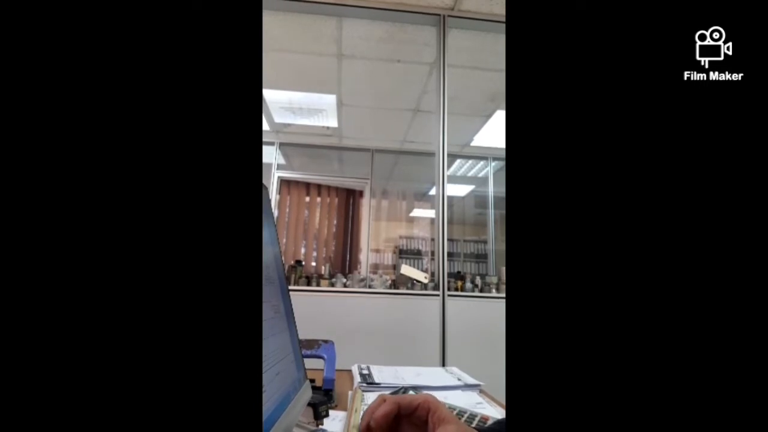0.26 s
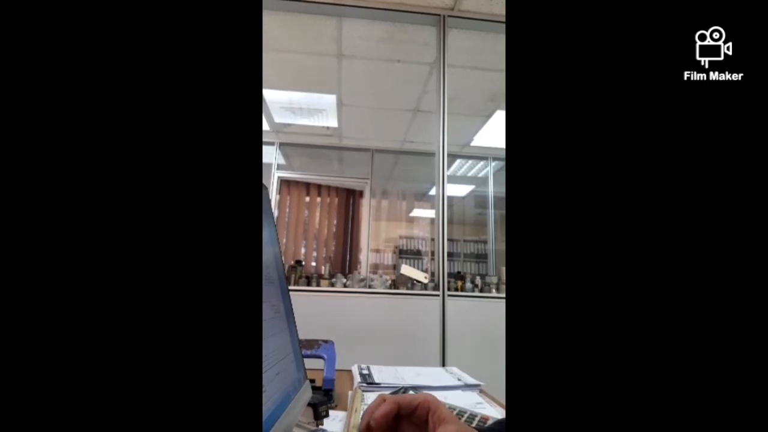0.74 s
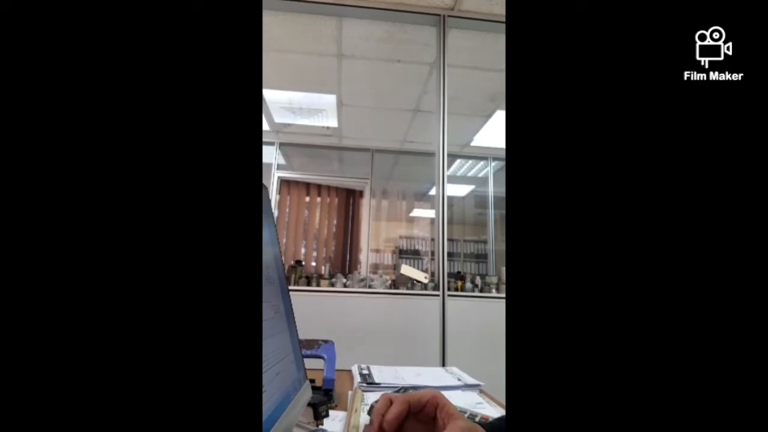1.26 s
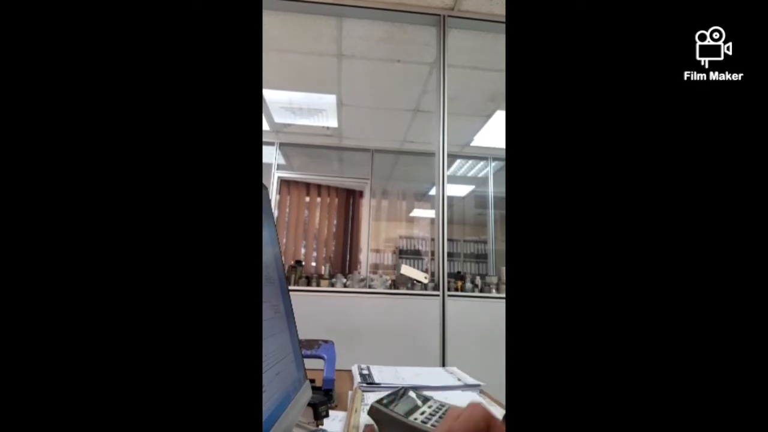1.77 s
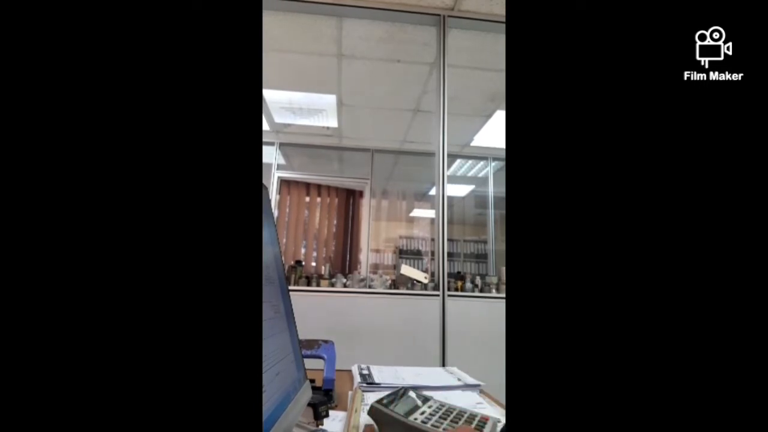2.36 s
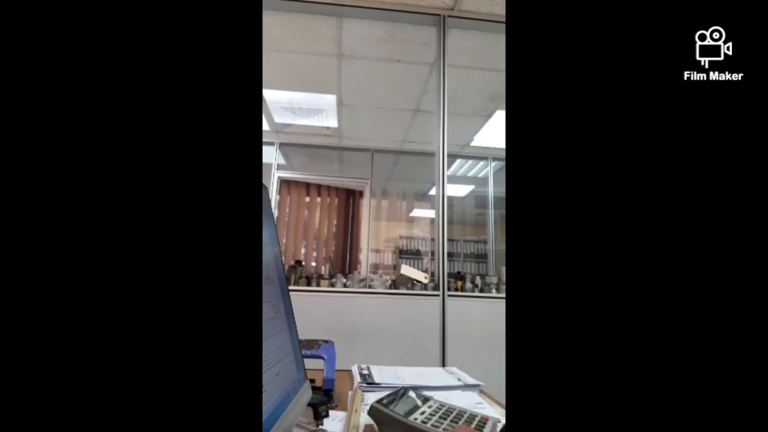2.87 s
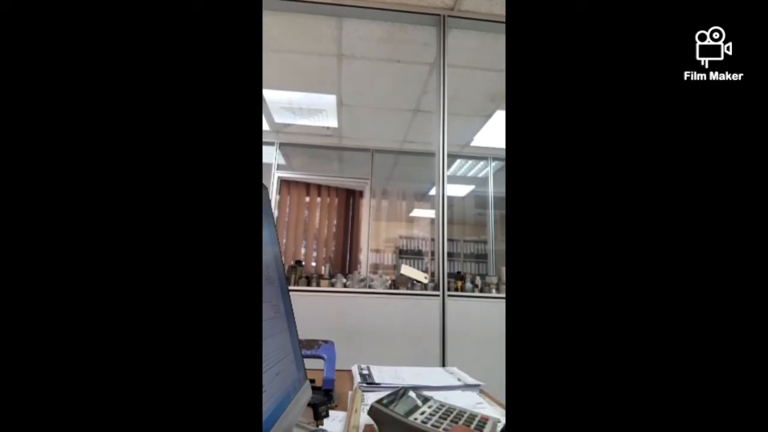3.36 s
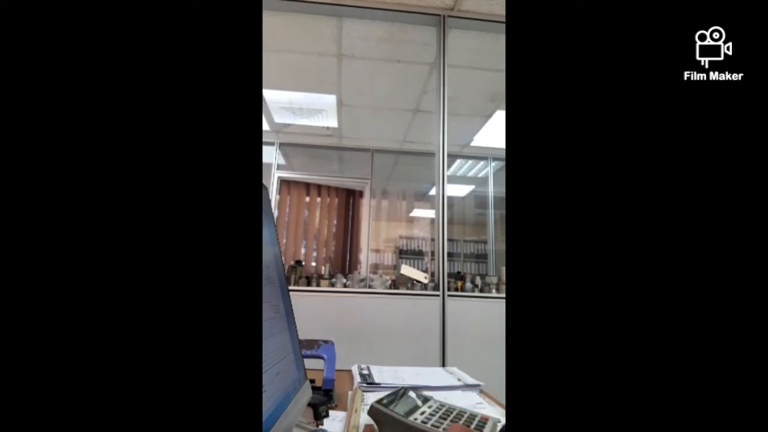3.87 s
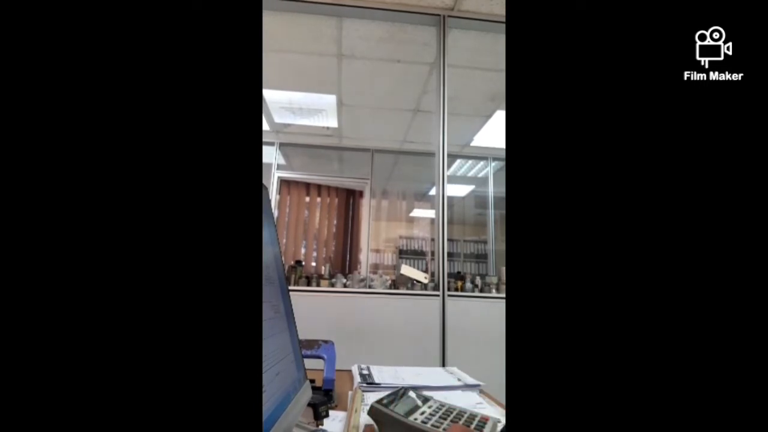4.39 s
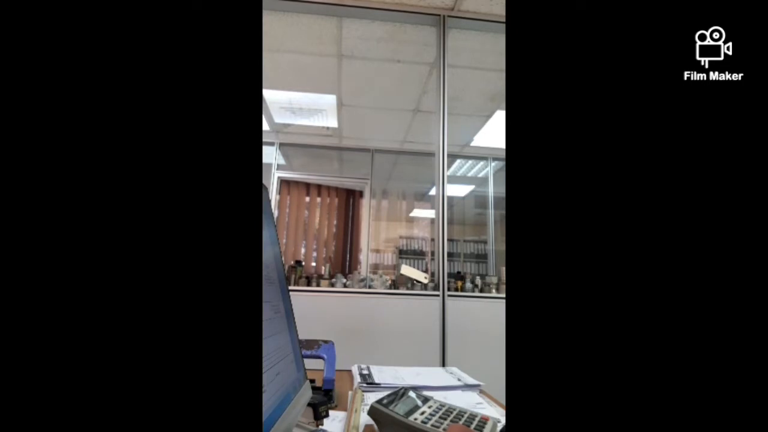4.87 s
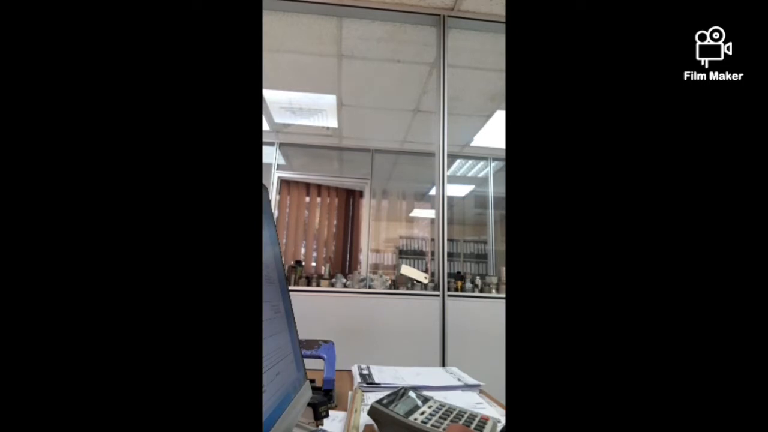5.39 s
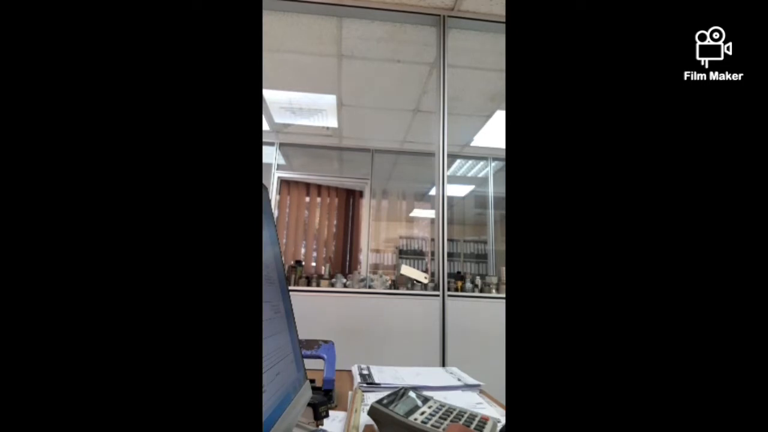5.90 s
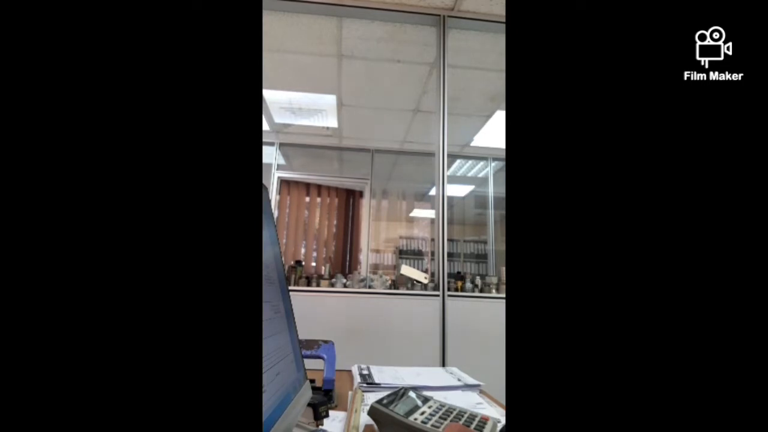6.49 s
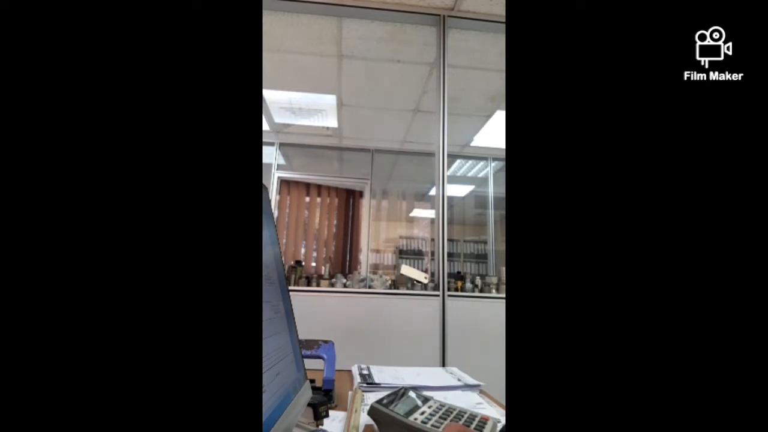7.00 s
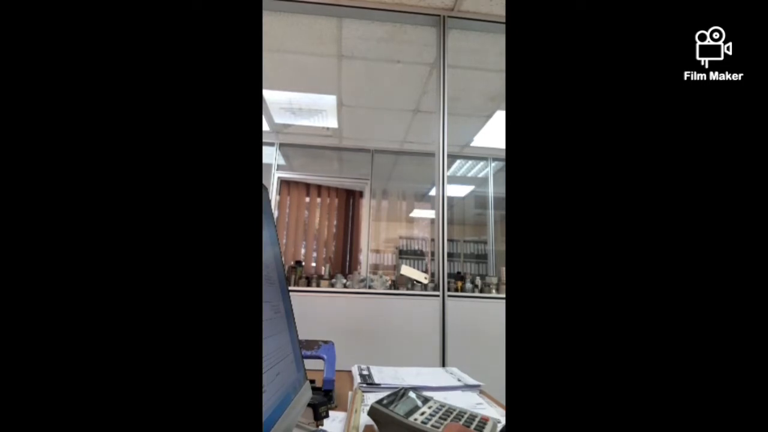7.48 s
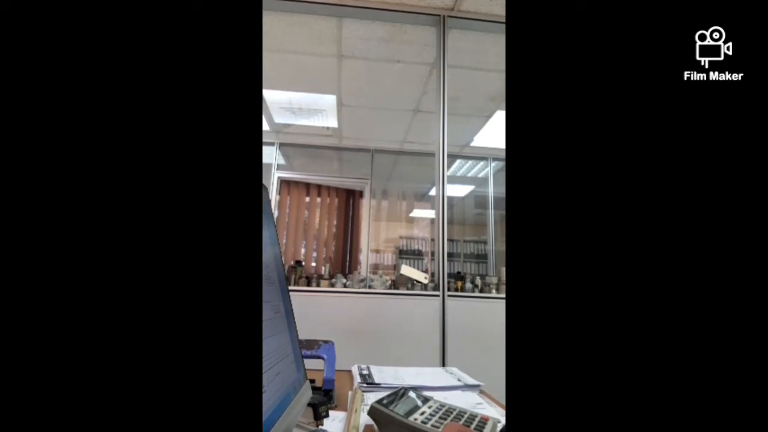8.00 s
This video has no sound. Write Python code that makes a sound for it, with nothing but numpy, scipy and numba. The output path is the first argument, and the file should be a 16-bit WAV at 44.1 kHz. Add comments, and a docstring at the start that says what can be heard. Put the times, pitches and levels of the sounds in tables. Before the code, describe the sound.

Fingers tap a desk calculator in uneven bursts, with light hand brushing and a quiet hum of office fans behind.

```python
"""Plastic keys of a desk calculator, pressed close to a phone lying on an office desk.
Each key knocks the case and the desk top, rattles and ticks; hands brush plastic and paper.
Behind them ventilation, fans and a motor hum, with a thin high tone and a few soft low blips.
At the phone's microphone the sound port rings at fixed pitches and the gain backs off on loud peaks."""
import sys
import numpy as np
from scipy import signal
from scipy.fft import rfft, irfft
from scipy.io import wavfile
from scipy.ndimage import uniform_filter1d
from numba import njit

SR = 44100
rng = np.random.default_rng(int(sys.argv[2]) if len(sys.argv) > 2 else 0)


def pcm_store(signal):
    """Save signal as 16-bit PCM."""
    levels = np.round(np.clip(np.atleast_2d(signal), -1, 1) * 32767)
    wavfile.write(sys.argv[1], SR, levels.astype(np.int16).T)


N = 363825
T = np.arange(N) / SR


def undb(db):
    return 10 ** (np.asarray(db) / 20)


def level(x, db):
    """Scale to an rms level."""
    return x * undb(db) / np.sqrt(np.mean(x ** 2))


def band(x, lo_hz, hi_hz):
    """Second-order band-pass."""
    sos = signal.butter(2, [lo_hz, min(hi_hz, .45 * SR)], "bandpass", fs=SR, output="sos")
    return signal.sosfilt(sos, x)


def fade(t, t60):
    """Falls 60 dB in t60 seconds."""
    return np.exp(-np.log(1000) * t / t60)


def walk(rate_hz):
    """Random levels held 1 / rate_hz seconds and smoothed twice; spread near 1."""
    hold = int(SR / rate_hz)
    steps = np.repeat(rng.standard_normal(N // hold + 1), hold)
    return 1.17 * uniform_filter1d(uniform_filter1d(steps, hold), hold)[:N]


def tone(hz, db, waver_db=1.5):
    """A sine that wavers a little in level and pitch."""
    amplitude = np.sqrt(2) * undb(db + waver_db * walk(9.7))
    wavering_hz = hz * (1 + 0.00398 * walk(6))
    return amplitude * np.sin(2 * np.pi * np.cumsum(wavering_hz) / SR)


def colour(x, resonances):
    """Lifts or dips the sound around each resonance."""
    for hz, width, boost_db in resonances:
        b, a = signal.iirpeak(hz, hz / width, fs=SR)
        x = x + (undb(boost_db) - 1) * signal.lfilter(b, a, x)
    return x


# Spectrum of the office ventilation, heard from the desk: f/Hz, relative level/dB
AIR = [(15, -68), (25, -30), (47, -8), (149, -3.5), (247, -8), (275, -9.5), (305, -6), (493, -11.5),
       (594, -11.5), (886, -17), (1250, -31), (2860, -41), (3260, -39.5), (13400, -54.5), (14500, -27.5)]
def ventilation():
    """Moving air makes a low rush whose five bands waver separately."""
    hz, db = np.transpose(AIR)
    f = np.maximum(np.arange(N // 2 + 1) * SR / N, 1)
    spectrum = rfft(rng.standard_normal(N)) * undb(np.interp(np.log(f), np.log(hz), db))
    edges_hz = [0, 100, 300, 1000, 3000, SR]
    air = sum(undb(1.5 * walk(3.11)) * irfft(spectrum * (f >= lo) * (f < hi), N)
              for lo, hi in zip(edges_hz, edges_hz[1:]))
    return level(air, db=-48)


# Course of a motor's whine in the background: t/s, f/Hz, level/dB
WHINE = [(0, 615, -61.5), (3.29, 615, -62), (3.36, 576, -60.5), (3.6, 575, -51), (4.22, 575, -53),
         (4.28, 575, -83), (4.342, 575, -51), (5.35, 577, -63.5), (5.9, 576, -54), (8.25, 576, -53.5)]
def motor():
    """A motor slows under load and falters once."""
    times, hz, db = np.transpose(WHINE)
    return tone(np.interp(T, times, hz), np.interp(T, times, db), waver_db=2.5)


# Fan and mains lines in the room tone: f/Hz, level/dB
HUM = [(60, -63.5), (119, -57), (147, -54), (241, -56), (311, -59), (858, -70)]
def hum():
    """Fans and mains drone on a few low pitches."""
    return sum(tone(hz, db) for hz, db in HUM)


def whistle():
    """A thin high tone, barely audible at the desk."""
    return tone(hz=2900, db=-87, waver_db=1.0)


# Key cap resonances, three that click, then three that tick:
# f/Hz, width/Hz, relative level/dB, level gained per dB of strength/(dB/dB)
CAP = [(2170, 430, -0.5, -0.13), (2870, 330, 0, 0.16), (3466, 310, -2.5, -0.36), (4700, 490, -3, 0.068),
       (6430, 330, -2.5, 0.062), (7960, 1160, -4, 0.28)]
def key_cap(snap, modes, strength_db, scatter):
    """The snap rings the chosen cap resonances, shared out a little differently each time."""
    usual_db, scatter_db = -25, 0.5
    return sum(undb(db + slope * (strength_db - usual_db) + scatter_db * draw)
               * band(snap, hz - width / 2, hz + width / 2) * np.sqrt(hz / width)
               for (hz, width, db, slope), draw in zip(CAP[modes], scatter))


# Modes of the calculator case: f/Hz, t60/s
CASE = [(540, 0.023), (610, 0.024), (680, 0.042), (745, 0.041), (810, 0.037), (870, 0.037), (940, 0.029),
        (1080, 0.022), (1180, 0.0047)]
def case_ring(t, case_hz):
    """The case's impulse response: modes near the key's own pitch take most of the blow."""
    hz, t60 = np.transpose(CASE)
    share = np.exp(-(np.log(hz / case_hz) / 0.097) ** 2) + 0.28
    return share @ (np.sin(2 * np.pi * hz[:, None] * t) * fade(t, t60[:, None]))


# Modes of the desk top under calculator and phone: f/Hz, relative level/dB, t60/s
DESK = [(172, -10, 0.17), (210.3, 7, 0.055), (253, 5.5, 0.041), (338, 4.5, 0.06), (413.7, -4, 0.16),
        (476, 7.5, 0.057)]
def desk_ring(t):
    """The desk's impulse response: low modes that die quickly."""
    return sum(undb(db) * np.sin(2 * np.pi * hz * t) * fade(t, t60) for hz, db, t60 in DESK)


def key_blow(knock_db, click_db, tick_db, thud_db, case_hz, rattle_s, noise, shake):
    """One blow and its loose rattle ring the case, the desk below and the small key cap."""
    t = T[:len(noise)]
    seat_s, contact_s = 0.0032, 0.00086
    seat = np.sin(np.pi / 2 * np.minimum(t / seat_s, 1)) ** 2  # force builds as the key tips and seats
    rattle = noise * fade(t, max(rattle_s, .005))
    snap = (rattle * 0.21 + noise * fade(t, 0.0087)) * np.sqrt(seat)
    push = -9 * np.sin(np.pi * np.minimum(t / contact_s, 1)) + 4.5 * rattle
    knock = seat * signal.fftconvolve(push, case_ring(t, case_hz))[:len(t)]
    thud = seat * signal.fftconvolve(push, desk_ring(t))[:len(t)]
    click = key_cap(snap, slice(0, 3), knock_db, shake) + 3.2 * band(snap, 1530, 4570)
    tick = key_cap(snap, slice(3, 6), tick_db, shake[::-1])
    tick += 0.72 * band(band(snap, 4100, 11400), 2900, 12400)
    clatter = band(shake * seat * fade(t, 4.8 * rattle_s), 110, 2570)  # neighbouring keys shake
    crack = band(snap, 1020, 1760)  # hard blows flex the case
    parts = [(knock, 0), (thud, thud_db), (click, click_db), (tick, tick_db),
             (clatter, 0.58 * click_db - 14), (crack, 1.1 * knock_db - 3.5)]
    return sum(undb(knock_db + db) * part / np.abs(part).max() for part, db in parts)


# Key blows close to the microphone, before the shell colours them: t/s, knock peak level/dB,
# click, tick and desk thud level/dB (each relative to the knock), case f/Hz, rattle t60/s
KEYS = [(0.088, -40.5, -12, -32.5, -17, 810, 0.11), (0.116, -42.5, -5.5, -25.5, -10, 756, 0.17),
        (0.56, -26.5, -6, -38, -21, 804, 0.007), (0.576, -43.5, 3, 1, -5, 760, 0.034),
        (0.913, -44.5, -14, -28, -14, 865, 0.024), (1.206, -36.5, -13.5, -41, -18, 870, .042),
        (2.248, -32.5, -20.5, -40, -30, 910, .044), (2.839, -30, -7, -1.5, -11, 770, 0.052),
        (2.961, -26.5, -7, -2.5, -27, 810, 0.023), (3.017, -30.5, -30, -33, -23, 910, 0.031),
        (3.025, -35.5, -8.5, -33, -8, 785, 0.038), (3.084, -32, -21, -33, -6, 585, 0.042),
        (3.151, -34.5, -20, -30, -4, 700, 0.083), (3.167, -30, -13.5, -16, -6, 976, 0.1),
        (3.211, -40.5, -11.5, -12, 2, 704, .073), (3.653, -32, -13, -13, -10, 540, 0.1),
        (3.659, -31.5, -2, -24, -20, 816, .035), (3.667, -30.5, -6, -8.5, -1.5, 767, 0.06),
        (3.756, -32.5, -8, -38, -3.5, 734, 0.062), (3.768, -28, -29, -18.5, -29, 760, 0.05),
        (3.931, -20.5, -3, -4.5, -9, 534, 0.084), (3.943, -16.5, -8.5, -35, -12, 684, 0.036),
        (3.998, -31.5, -16, -13, 2, 835, 0.041), (4.015, -28, 0, -12, -7, 680, 0.027),
        (4.024, -28, -34, -7, 1.5, 730, 0.064), (4.492, -22, -8.5, -42, -2.5, 880, 0.076),
        (4.51, -26.5, -10, -38, -21, 746, 0.014), (4.584, -40.5, -5.5, -16, -16, 760, 0.22),
        (4.601, -29, -15.5, -35, -30, 790, 0.038), (4.615, -35.5, -13.5, -35, -21, 574, 0.028),
        (4.775, -22, -8, -44, -3.5, 760, 0.044), (4.818, -49, -5, -3, -4, 775, .035),
        (4.84, -33.5, -12, -18, -11, 750, 0.088), (4.87, -36, -3.5, -23, -20, 850, 0.034),
        (5.689, -13.5, -18.5, -23.5, -3.5, 770, 0.044), (5.703, -5.5, -15, -22, -24, 730, 0.032),
        (5.713, -16.5, -17, -34, -6, 683, 0.02), (5.744, -23.5, -13.5, -32, -3, 740, 0.079),
        (5.774, -23, -8.5, -27, -14, 705, 0.034), (5.785, -22.5, -11.5, -18, 1, 850, 0.12),
        (5.856, -37, -30, -40, 5.5, 783, .06), (6.157, -30.5, -13.5, -32, -9, 830, 0.053),
        (6.221, -32, -20, -22, -11, 980, 0.033), (6.351, -37.5, -10, -13, -14, 840, 0.037),
        (6.411, -34.5, -14, -35, -24, 870, 0.044), (6.435, -38, -12, -19, -8, 890, 0.059),
        (6.985, -31.5, -10.5, -20, -3, 610, 0.074), (7.295, -24.5, -11.5, -31, -37, 832, 0.0086),
        (7.762, -33.5, -10, -17, -16, 898, 0.045)]
def key_presses():
    """Fingers strike the keys singly and in quick runs, each blow with its own rattle."""
    out, length = np.zeros(N + SR), SR // 4
    for onset_s, *blow in KEYS:
        noise, shake = rng.standard_normal((2, length))
        start = int(onset_s * SR)
        out[start:start + length] += key_blow(*blow, noise, shake)
    return out[:N]


# Hand strokes close to the microphone: loudest t/s, length/s, level/dB before the shell, centre f/Hz
BRUSH = [(.14, 0.063, -67.5, 3570), (0.596, 0.073, -67, 4200), (1.058, 0.17, -63.5, 4700),
         (2.362, 0.16, -50.5, 1220), (3.201, 0.058, -59.5, 3600), (4.036, 0.037, -49.5, 6000),
         (6.257, 0.15, -58, 4630), (6.392, 0.1, -59.5, 4200), (7.04, .13, -71.5, 4400),
         (7.213, 0.12, -66.5, 1750), (7.401, .16, -65, 700), (7.618, 0.14, -70.5, 2980),
         (7.819, 0.1, -74, 4840), (8.137, 0.11, -65, 4030)]
def brushing():
    """Skin slides on plastic and paper: a soft grainy hiss that swells and dies."""
    out, t = np.zeros(N + SR), T[:SR] - .5
    rise_share = 0.34
    for peak_s, length_s, db, hz in BRUSH:
        swell = np.exp(-(t / (length_s * np.where(t < 0, rise_share, 1 - rise_share))) ** 2)
        lo_hz, hi_hz = hz / 3.6, hz * 2.33
        hiss = band(rng.standard_normal(SR), lo_hz, hi_hz)
        hiss = band(hiss, lo_hz / 2, 9600)
        start = int(peak_s * SR)
        out[start:start + SR] += swell * level(hiss, db)
    strokes = out[SR // 2:][:N]  # puts each swell's top at its listed time
    grain = undb(1.4 * walk(270))
    return shell(strokes * grain)


# Resonances of the calculator's shell: f/Hz, width/Hz, boost/dB
SHELL = [(1440, 420, 1), (2250, 68, 2), (3690, 270, 5.5), (3850, 1300, -5), (4580, 160, 2.5),
         (8230, 460, -2)]
def shell(x):
    """The hollow plastic shell colours the sounds made on it."""
    return colour(x, SHELL)


def room(x, t60_s=0.53, db=-10.5):
    """Dense echoes off the office's walls and glass reach the desk, duller as they die."""
    t = T[:SR // 2]
    noise = rng.standard_normal(len(t)) * (t > .006)
    dull = band(noise, 92, 3000)
    tail = dull * fade(t, t60_s) + 1.4 * (noise - dull) * fade(t, 0.6 * t60_s)
    return signal.fftconvolve(x, tail * undb(db) / np.sqrt(np.sum(tail ** 2)))[:N]


# A faint low tone that comes and goes in the background: loudest t/s, f/Hz, level/dB
BLIP = [(2.36, 405, -44.5), (6.2, 435, -45.5), (6.3, 435, -50.5), (6.52, 420, -48.5), (7.4, 450, -47.5),
        (8.22, 445, -44)]
def blips(half_width_s=0.032):
    """Short soft sines, each under a bell-shaped swell."""
    return sum(undb(db) * np.sqrt(2) * np.sin(2 * np.pi * hz * T)
               * np.exp(-((T - peak_s) / half_width_s) ** 2) for peak_s, hz, db in BLIP)


def scene():
    """Mono, from the desk top: keys and hands close by, the office all around."""
    near = shell(key_presses() + brushing())
    return (near + room(near) + ventilation() + motor() + hum() + whistle() + blips())[None]


@njit
def gain_control(x, threshold, min_gain, hold_s, release_s):
    """Gain slides down when a peak passes the threshold, holds, then creeps back."""
    y, aim, gain, wait = np.empty(len(x)), 1., 1., 0.
    for i in range(len(x)):
        if abs(x[i]) > threshold:
            aim = max(min_gain, min(aim, threshold / abs(x[i])))
            wait = hold_s * SR
        wait -= 1
        if wait < 0:
            aim += (1 - aim) / (release_s * SR)
        gain += (aim - gain) * .0005  # follows in about 45 ms
        y[i] = gain * x[i]
    return y


# Resonances of the sound port in front of the microphone: f/Hz, width/Hz, boost/dB
PORT = [(826, 200, 6), (1364, 600, -8.5), (2067, 210, 8.5), (2870, 46, 11), (3486, 66, 8), (4820, 440, 3.5),
        (5600, 1000, 0.5), (6220, 71, 3), (7930, 130, 8), (8920, 113, 9.5), (10470, 150, 0),
        (12100, 1100, 0), (12960, 190, 13)]
def record(dry):
    """The phone's microphone: a small capsule short of bass, a ringing port, gain control, a top cut."""
    bass_cut = signal.butter(2, 55, "highpass", fs=SR, output="sos")
    top_cut = signal.ellip(8, .2, 55, 13950, fs=SR, output="sos")
    x = colour(signal.sosfilt(bass_cut, dry[0]), PORT)
    x = gain_control(x, threshold=0.42, min_gain=undb(-3.0), hold_s=1.15, release_s=.35)
    return signal.sosfilt(top_cut, x)[None]


dry = scene()
out = record(dry)
pcm_store(out)
```